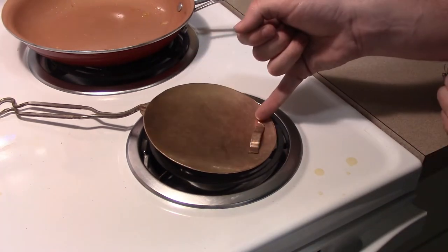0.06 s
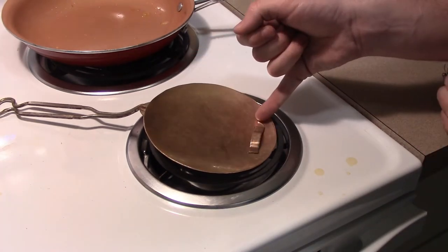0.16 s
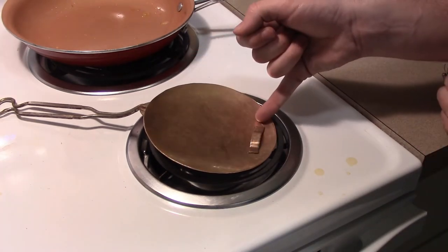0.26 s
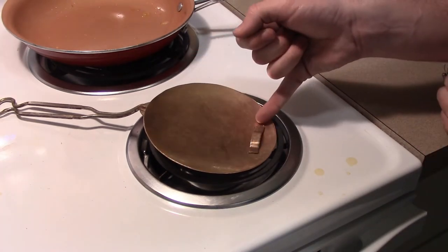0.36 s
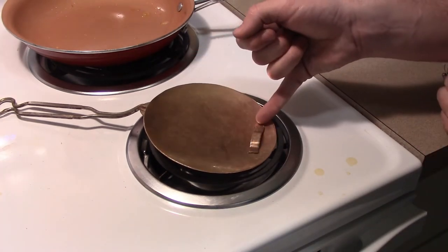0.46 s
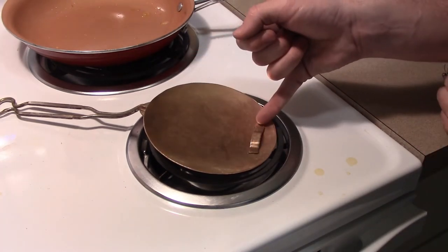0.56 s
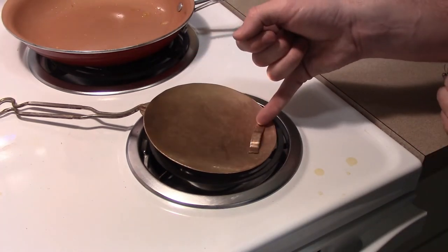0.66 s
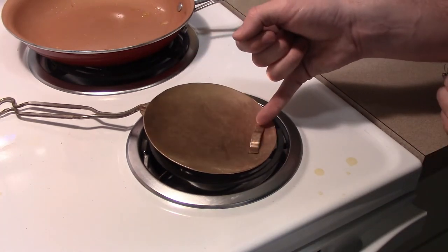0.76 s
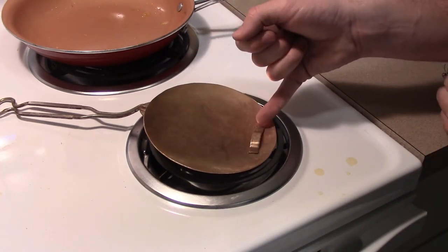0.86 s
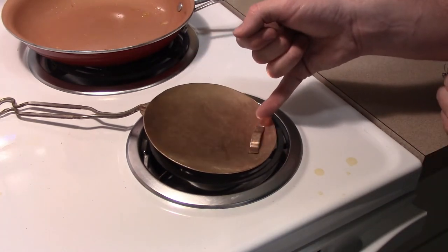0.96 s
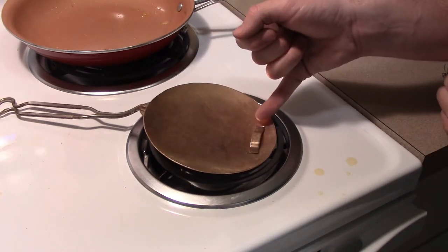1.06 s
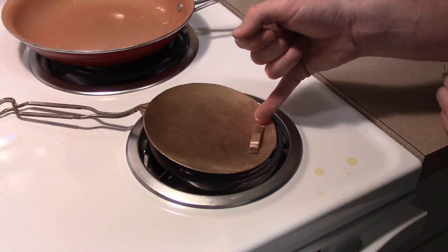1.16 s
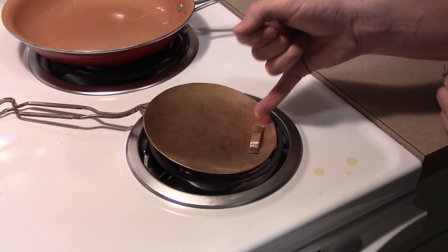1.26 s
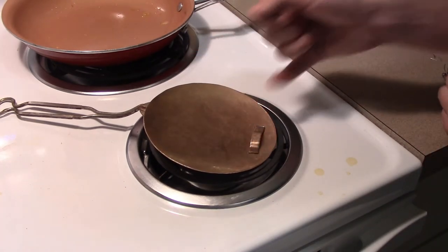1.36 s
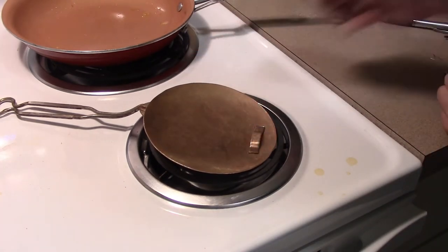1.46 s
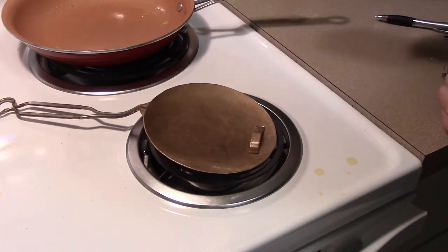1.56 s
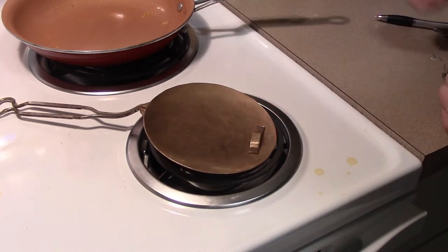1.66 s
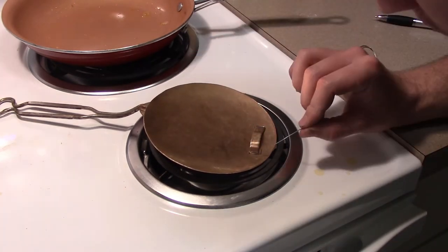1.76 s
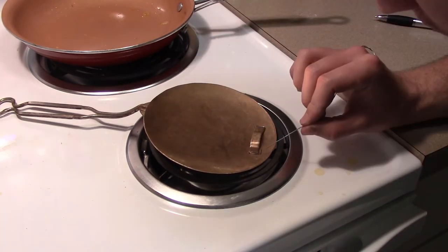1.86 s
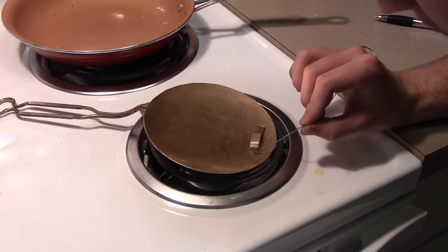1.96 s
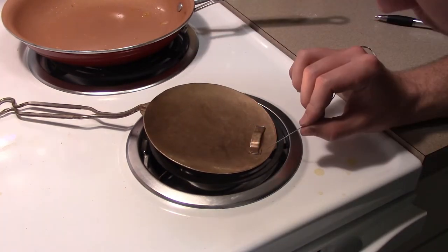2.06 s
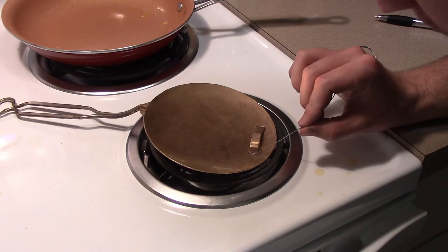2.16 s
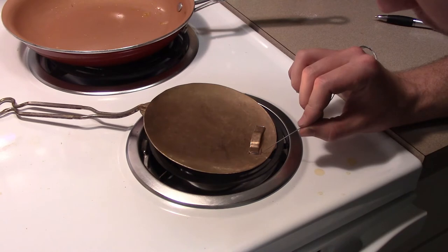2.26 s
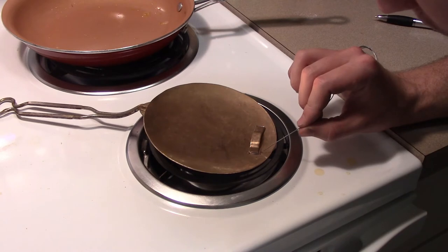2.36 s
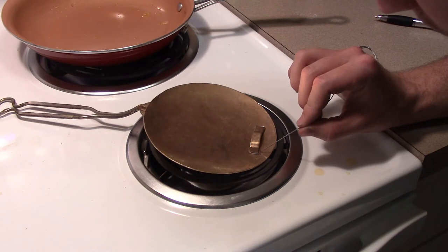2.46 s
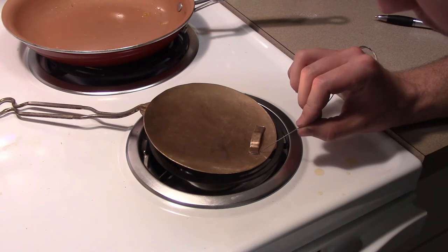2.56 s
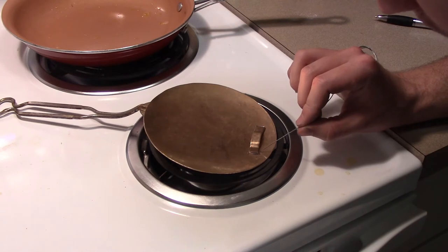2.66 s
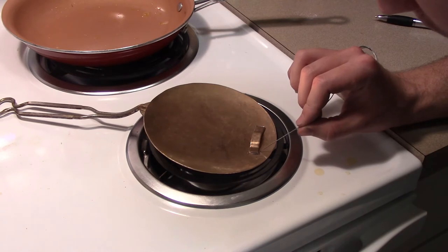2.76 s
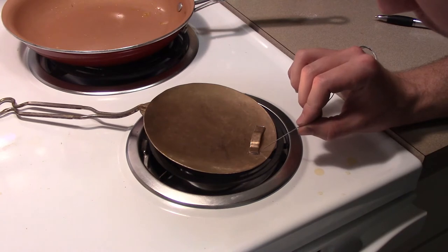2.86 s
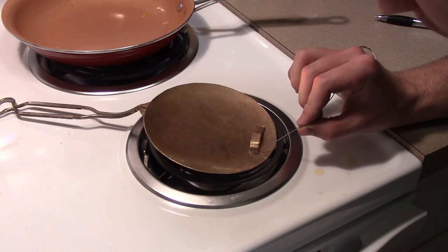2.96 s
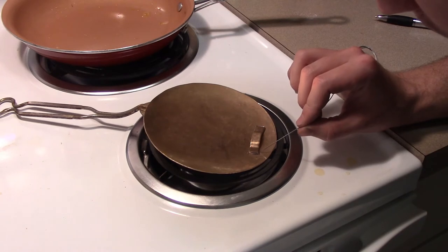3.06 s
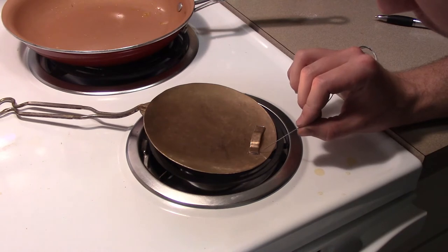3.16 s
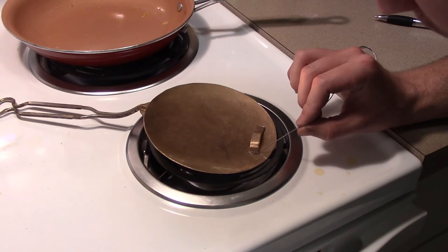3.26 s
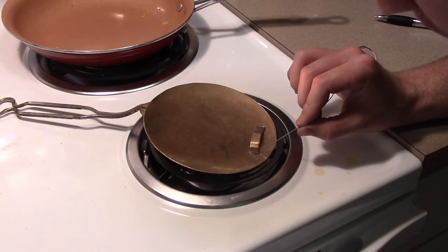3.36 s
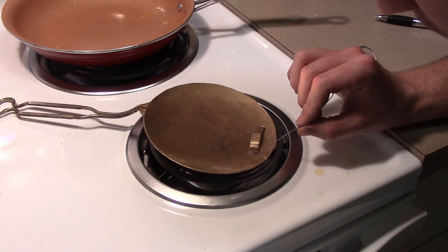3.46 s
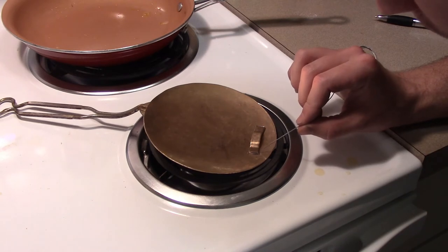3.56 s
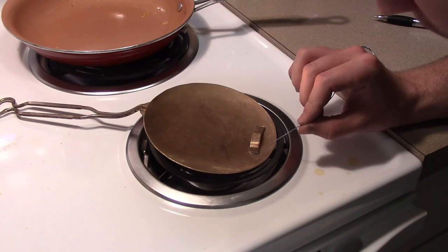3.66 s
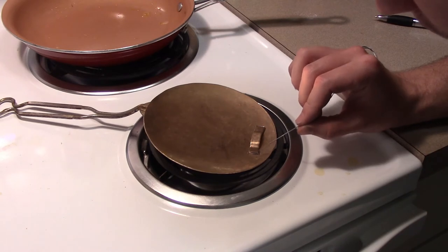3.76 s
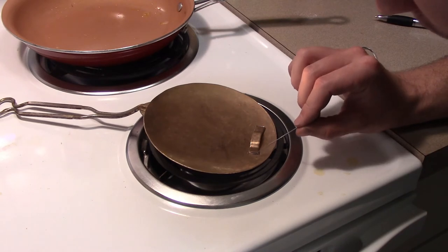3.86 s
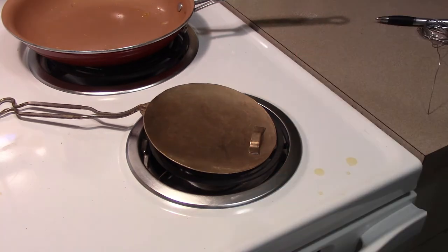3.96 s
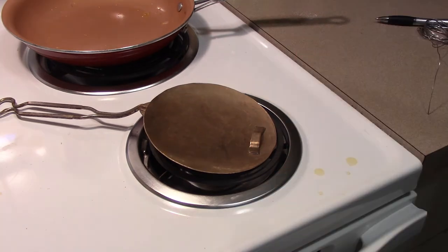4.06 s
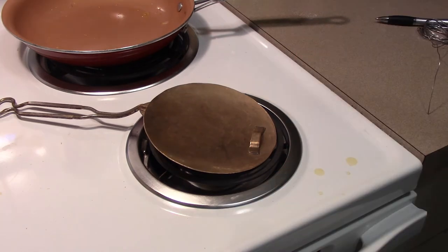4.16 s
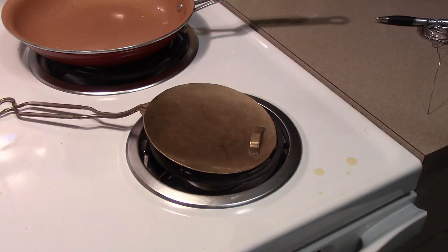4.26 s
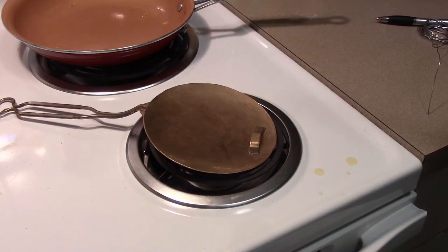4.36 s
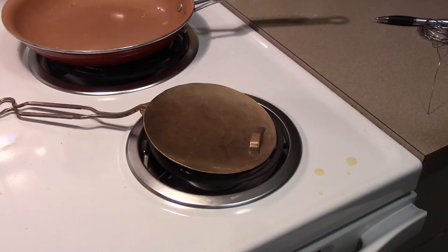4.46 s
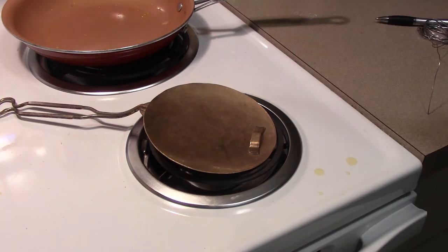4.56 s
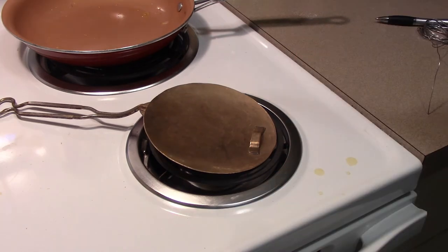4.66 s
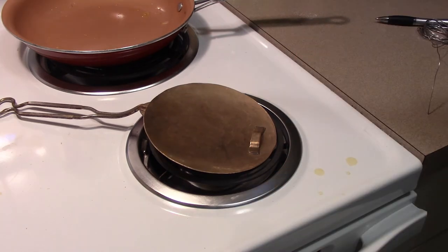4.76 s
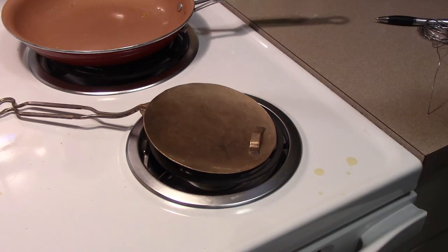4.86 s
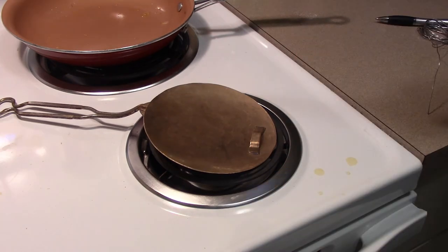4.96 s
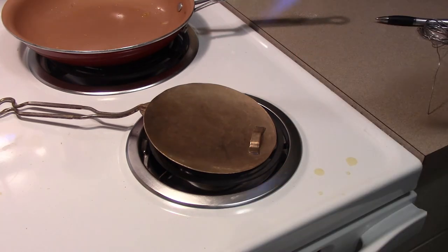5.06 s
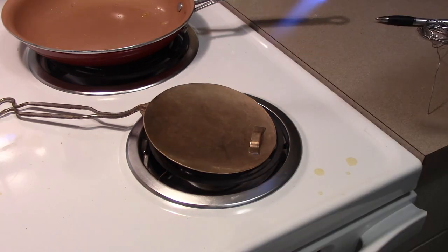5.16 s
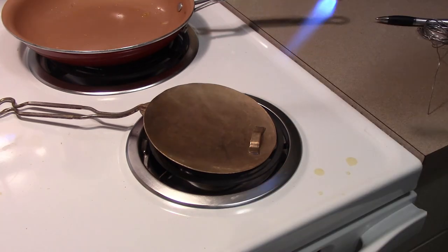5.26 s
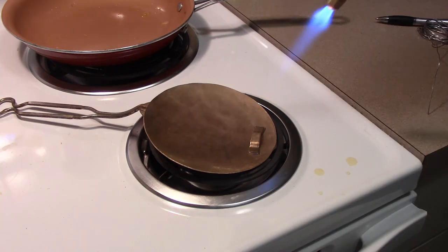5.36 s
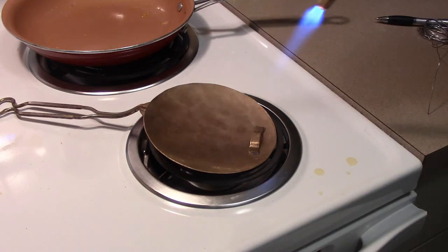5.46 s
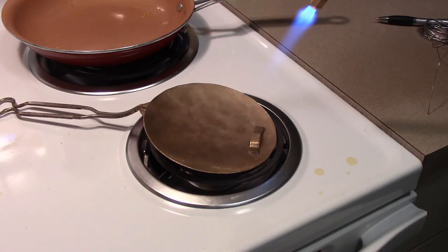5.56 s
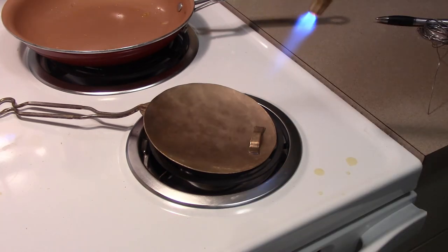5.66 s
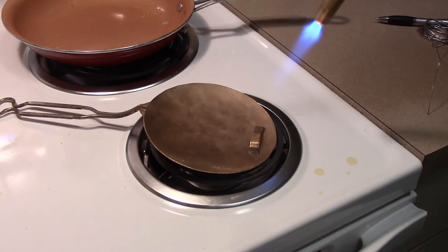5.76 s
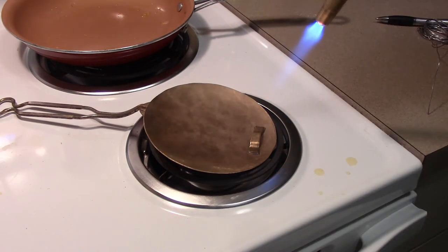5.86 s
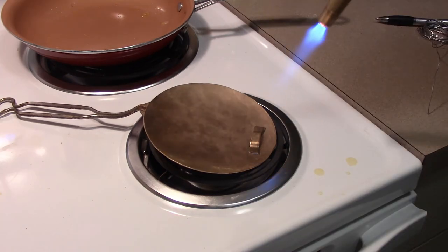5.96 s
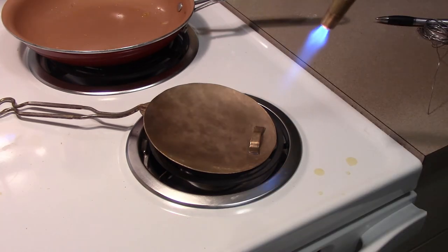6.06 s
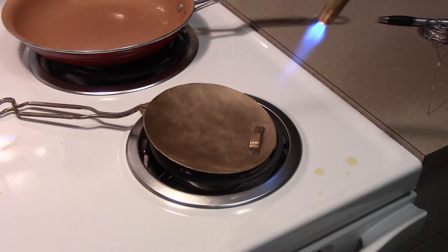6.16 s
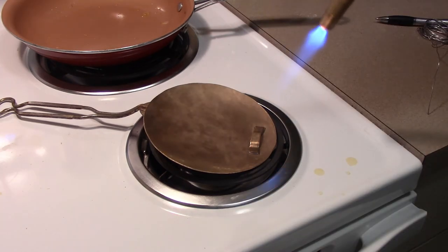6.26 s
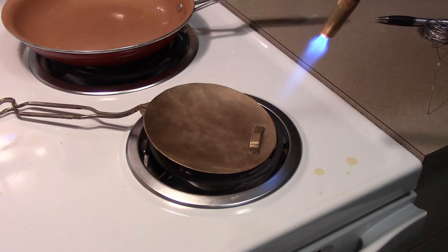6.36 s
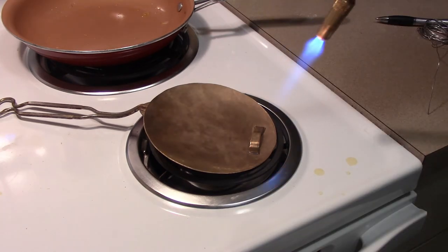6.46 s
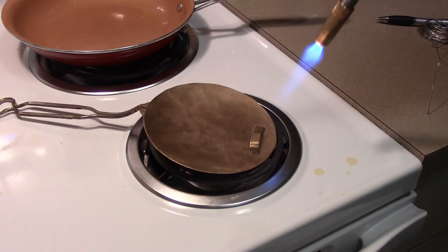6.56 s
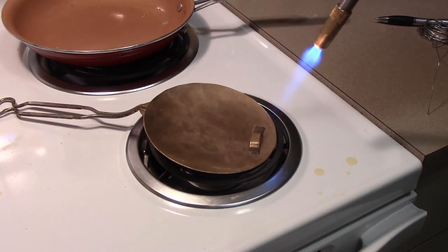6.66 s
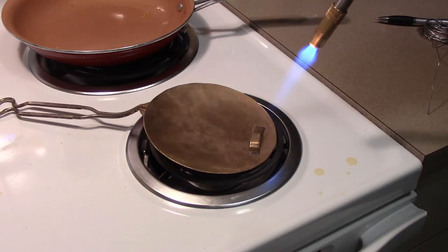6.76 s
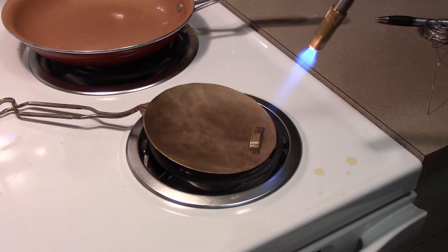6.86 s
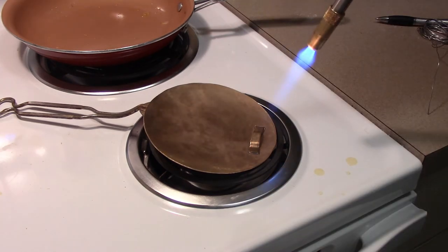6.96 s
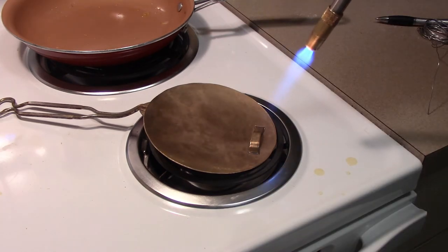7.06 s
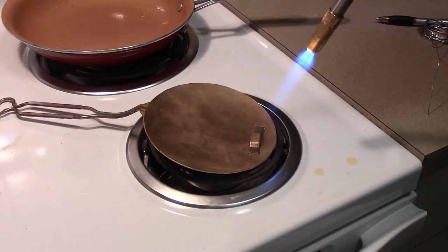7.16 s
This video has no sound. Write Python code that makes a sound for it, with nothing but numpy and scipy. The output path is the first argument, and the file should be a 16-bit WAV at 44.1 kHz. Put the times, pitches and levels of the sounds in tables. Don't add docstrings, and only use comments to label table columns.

```python
import sys
import numpy as np
from scipy import signal
from scipy.fft import irfft
from scipy.io import wavfile
from scipy.ndimage import uniform_filter1d

SR = 44100
rng = np.random.default_rng(int(sys.argv[2]) if len(sys.argv) > 2 else 0)


def rack_gain(trim_db):
    fader = np.asarray(trim_db, float)
    return 10 ** (fader / 20)


def int16_out(signal):
    q = np.round(np.clip(np.atleast_2d(signal).T, -1, 1) * 32767)
    wavfile.write(sys.argv[1], SR, q.astype(np.int16))


N = 318402


def evened(x):
    return x / np.sqrt(np.mean(x ** 2) + 1e-20)


def read(points, hz):
    f, value = np.transpose(points)
    return np.interp(np.log(hz + 1), np.log(f + 1), value)


def bumps_db(modes, hz):
    return sum(db / (1 + (2 * (hz - f) / width) ** 2) for f, width, db in modes)


def noise(field_db, side, patchy_db, flicker_db, ripple_db, span, size=2048):
    first = round(span[0] * SR)
    count = min(round(span[1] * SR), N) - first
    frames = 2 * count // size + 5
    hz = np.fft.rfftfreq(size, 1 / SR)[:, None]
    t = span[0] + np.arange(frames) * size / 2 / SR
    a, b, c, d, patch, ripple = rng.standard_normal((frames, len(hz), 6)).T
    patch = uniform_filter1d(patch, size=size // 100, axis=0)
    patch = evened(uniform_filter1d(patch, size=3, axis=1))
    ripple = uniform_filter1d(ripple, size=3, axis=0)
    ripple = evened(uniform_filter1d(ripple, size=16, axis=1))
    flicker = evened(uniform_filter1d(rng.standard_normal(frames), size=2))
    mid = a + 1j * b
    across = (c + 1j * d) * rack_gain(read(side, hz))
    gain = rack_gain(field_db(hz, t) + patchy_db * patch + flicker_db * flicker + ripple_db * ripple)
    spectrum = np.array([mid + across, mid - across]) * gain
    sound = signal.istft(spectrum, window="cosine", nperseg=size, noverlap=size // 2)[1]
    out = np.zeros((2, N))
    out[:, first:first + count] = evened(sound[:, :count])
    return out


def colour(x, points):
    hz = abs(np.fft.fftfreq(4096, 1 / SR))
    log_gain = np.log(rack_gain(np.maximum(read(points, hz), -80)))
    phase = -signal.hilbert(log_gain).imag
    taps = np.fft.ifft(np.exp(log_gain + 1j * phase)).real[:2048]
    return signal.oaconvolve(x, taps / np.linalg.norm(taps))[:N]


def add(mix, s, sound):
    part = mix[round(s * SR):][:len(sound)]
    part += sound[:len(part)]


SHAFT_HZ = 4327.3 / 74
COMB_DB = -86
WHINE_DB, WHINE_RISE_DB, WHINE_RISE_S, WHINE_END_S = -75, 4.5, 1.75, 4.3
# shaft_multiple, level_db
VALVE_KNOCKS = [(13, -60), (15, -62), (24, -72.5), (29, -67.5), (32, -77), (36, -75), (37, -77), (44, -79),
                (62, -79), (63, -76), (79, -78), (81, -77), (86, -80), (94, -81)]
# pitch_hz, level_db, start_rad
MOTOR_HUM = [(119.88, -45.5, 0), (116.86, -55, 3.99)]
# pitch_hz, level_db
FAN_LINES = [(95.8, -60), (191.7, -57), (240.2, -60), (360.2, -49.5), (384.3, -51), (479.3, -51.5),
             (600.4, -60)]


def refrigerator():
    t = np.arange(N) / SR
    wobble = 0.00035 * evened(uniform_filter1d(rng.standard_normal(N), size=8000))
    turns = SHAFT_HZ * t + wobble
    level = np.zeros(2049)
    level[40:108] = rack_gain(COMB_DB)
    for multiple, db in VALVE_KNOCKS:
        level[multiple] = rack_gain(db)
    one_turn = 2048 * irfft(level * np.exp(2j * np.pi * rng.random(2049)))
    hum = np.interp(turns % 1, np.arange(4096) / 4096, one_turn)
    rise = np.clip((t - WHINE_RISE_S) / .2, 0, 1)
    fall = np.clip((WHINE_END_S - t) / .6, 0, 1)
    whine = np.sin(2 * np.pi * 74 * turns)
    hum += whine * rack_gain(WHINE_DB + WHINE_RISE_DB * rise * fall)
    for hz, db, start in MOTOR_HUM:
        hum += rack_gain(db) * np.sin(2 * np.pi * hz * t + start)
    for hz, db in FAN_LINES:
        wander = np.cumsum(uniform_filter1d(rng.standard_normal(N), size=4000)) * .02
        hum += rack_gain(db) * np.sin(2 * np.pi * hz * t + wander)
    return np.sqrt(2) * hum


AIR_DB = -38.5
# pitch_hz, density_db
AIR_SPECTRUM = [(25, -43), (70, -38), (95, -11.5), (135, -14), (190, -8), (290, -7), (370, -3.5),
                (520, -10), (800, -16.5), (1300, -23), (2280, -33), (4000, -38.5), (9000, -39.5),
                (13500, -47.5), (16000, -58)]
# pitch_hz, width_hz, gain_db
AIR_RESONANCES = [(192, 23, 4), (267, 21, 1.5), (352, 82, 4), (387, 14, 2.5), (474, 24, 4), (606, 28, 6),
                  (790, 33, 3.5)]
# pitch_hz, side_minus_mid_db
AIR_WIDTH = [(60, -18), (110, -23.5), (200, -22), (380, -27.5), (700, -19), (1290, -16), (2380, -10),
             (4400, -11), (8120, -14), (15000, -11)]


def air():
    def shape(hz, t):
        return read(AIR_SPECTRUM, hz) + bumps_db(AIR_RESONANCES, hz)

    return rack_gain(AIR_DB) * noise(shape, AIR_WIDTH, patchy_db=1.3, flicker_db=0.4, ripple_db=0.9,
                               span=(0, 8), size=4096)


RUSTLE_HZ, RUSTLE_EDGE_DB, RUSTLE_REST_DB = 7150, -9, -76
# middle_s, half_length_s, level_db
STROKES = [(.0, .04, -62), (.4, .2, -61), (.72, .1, -64), (1.06, .14, -60), (1.37, .1, -62),
           (1.54, .09, -63), (1.79, .08, -63), (2.6, .3, -65), (2.95, .1, -66), (3.2, .1, -65),
           (3.55, .15, -67), (3.79, .1, -68)]


def rustle():
    def shape(hz, t):
        return -14 * np.log2((hz + 1) / RUSTLE_HZ) ** 2 / .4

    band = noise(shape, AIR_WIDTH, patchy_db=3.0, flicker_db=1.1, ripple_db=2.5, span=(0, 4), size=1024)
    t = np.arange(N) / SR
    swell = rack_gain(RUSTLE_REST_DB)
    for middle, half, db in STROKES:
        distance = np.minimum(abs(t - middle) / half, 4)
        swell = swell + rack_gain(db + RUSTLE_EDGE_DB * distance ** 3)
    return band * swell


# middle_s, level_db, pitch_hz
FLOOR_BUMPS = [
    (1.67, -41, 48),
    (3.945, -38, 52),
]


def floor_bumps():
    out, t = np.zeros(N), np.arange(SR // 4) / SR
    for s, db, hz in FLOOR_BUMPS:
        pulse = np.exp(-((t - .015) / .012) ** 2)
        add(out, s - .015, rack_gain(db) * np.sin(2 * np.pi * hz * t) * pulse)
    return out


# start_s, level_db
DRY_TICK = (3.9462, -30)


def tick():
    out, t = np.zeros(N), np.arange(200) / SR
    s, db = DRY_TICK
    add(out, s, rack_gain(db) * np.exp(-t / .00012))
    return out


OPENING_S, SHUT_DB, FADING_CURVE = .015, -37, 1.1
# start_s, open_s, flow_db, fading_s, low_tube_share (0 to 1)
TRIGGER_PRESSES = [
    (4.078, .16, -32, .23, .5),
    (4.572, .11, -31.5, .035, 1.0),
]


def flow(t):
    total = 0
    for s, held, db, fading, _ in TRIGGER_PRESSES:
        still_shut = np.maximum(1 - (t - s) / OPENING_S, 0)
        faded = np.maximum((t - s - held) / fading, 0) ** FADING_CURVE
        total = total + rack_gain(db + SHUT_DB * np.minimum(still_shut + faded, 3))
    return total


# pitch_hz, density_db
JET_SPECTRUM = [(350, -45), (700, -13), (1100, -10), (1800, -20), (2800, -15.5), (3500, -13), (4100, -16),
                (5300, -4.5), (7500, -10.5), (10500, -8.5), (13600, -12), (16000, -35)]
# pitch_hz, width_hz, gain_db
TUBE_RESONANCES = [(1040, 130, 12), (2210, 320, 14), (3470, 150, 14), (4790, 150, 8), (5720, 220, 10.5),
                   (6250, 130, 6), (7170, 130, 4)]
# pitch_hz, side_minus_mid_db
GAS_WIDTH = [(60, -24), (110, -31), (200, -21), (380, -30), (700, -21), (1290, -45), (2380, -27),
             (4400, -24), (8120, -13), (15000, -21)]


def gas():
    def shape(hz, t):
        first, second = TRIGGER_PRESSES
        low_share = np.where(t < second[0], first[4], second[4])
        tube = low_share * bumps_db(TUBE_RESONANCES[:2], hz) + bumps_db(TUBE_RESONANCES[2:], hz)
        weakness = np.clip((-32 - 20 * np.log10(flow(t))) / 12, 0, 1)
        treble_octaves = np.maximum(np.log2((hz + 1) / 6300), 0)
        return read(JET_SPECTRUM, hz) + tube - 13.0 * weakness * treble_octaves

    jet = noise(shape, GAS_WIDTH, patchy_db=1.0, flicker_db=0.2, ripple_db=2.0, span=(4, 5), size=1024)
    return jet * flow(np.arange(N) / SR)


# pitch_hz, t60_s
KITCHEN_DECAY = [(200, .45), (1000, 0.36), (4000, 0.33), (8000, 0.32), (15000, .15)]


def kitchen(x):
    taps = np.zeros((2, SR // 2))
    at = np.arange(120, SR // 2 - 20, 20) + rng.integers(0, 20, (2, (SR // 2 - 121) // 20))
    np.put_along_axis(taps, at, rng.choice([-1., 1.], at.shape), 1)
    hz, t, z = signal.stft(taps, SR, nperseg=256)
    t60 = np.maximum(read(KITCHEN_DECAY, hz), .05)[:, None]
    tail = signal.istft(z * rack_gain(-60 * t / t60), SR, nperseg=256)[1]
    stereo = tail[0] + rack_gain(-12) * np.array([tail[1], -tail[1]])
    return signal.fftconvolve(x[None], stereo / np.linalg.norm(tail[0]), axes=1)[:, :N]


# start_s, level_db, rattle_ms
TRIGGER_BLOWS = [
    (4.1172, -6, 1.3),
    (4.1198, -11, 2.6),
    (4.1230, -7, 2.5),
    (4.2386, -15, .7),
    (4.2450, -36, 2.2),
    (4.6843, -5, .9),
    (4.6866, -12, 1.4),
]
# start_s, pitch_hz, level_db, t60_ms
PART_RINGS = [(4.1172, 2730, -12, 25), (4.1176, 3500, -15, 25), (4.1198, 8900, -19, 20),
              (4.1230, 7800, -13, 15), (4.2382, 2700, -21, 16), (4.2390, 1500, -29, 25),
              (4.2392, 10300, -28, 15), (4.2450, 8300, -25, 18), (4.4085, 1570, -39, 25),
              (4.6843, 10700, -7, 9), (4.6866, 3900, -16, 15), (4.6920, 9700, -17, 30)]
# pitch_hz, density_db
SNAP_SPECTRUM = [(300, -51), (700, -16.5), (1500, -7.5), (2000, -15.5), (2900, -8), (4000, -8.5),
                 (6000, -8), (10400, -9), (14000, -17), (16000, -30)]


def trigger():
    rattle, ring, t = np.zeros(N), np.zeros(N), np.arange(3000) / SR
    for s, db, ms in TRIGGER_BLOWS:
        grit = rng.standard_normal(len(t))
        add(rattle, s, rack_gain(db) * grit * np.minimum(t / .0003, 1) * np.exp(-t * 1000 / ms))
    for s, hz, db, t60_ms in PART_RINGS:
        decay = rack_gain(db - 60000 * t / t60_ms)
        add(ring, s, decay * np.minimum(t / .0004, 1) * np.sin(2 * np.pi * hz * t))
    rattle = colour(rattle, SNAP_SPECTRUM)
    direct = (rattle + ring) * rack_gain([[-.6], [.6]])
    return direct + rack_gain(-3.5) * kitchen(rattle + .2 * ring)


# start_s, push_db, pitch_hz, push_length_s, room_ring_db, t60_s
LIGHTING_PUFF = (4.6864, -3.5, 268, .0017, -7.5, .15)


def puff():
    out, t = np.zeros(N), np.arange(SR // 4) / SR
    s, push_db, hz, length, ring_db, t60 = LIGHTING_PUFF
    push = rack_gain(push_db) * np.exp(-((t - .0017) / length) ** 2)
    room_ring = rack_gain(ring_db - 60 * t / t60)
    sound = (push + room_ring) * np.minimum(t / .0012, 1) * np.sin(2 * np.pi * hz * t - 1.85)
    add(out, s, signal.lfilter(*signal.butter(1, 90, "high", fs=SR), sound))
    return out


ROAR_DB, ROAR_NEAR_DB = -12.9, 2.8
HISS_DB, HISS_NEAR_DB = -16.8, -.6
SETTLE_S, SETTLE_TAKES_S, LOOSE_ROAR_DB, LOOSE_HISS_DB = 4.718, .012, -6, .6
STEP_HZ, STEP_DB = 13650, -6
# time_s, nearness (0 to 1)
TORCH_PATH = [
    (4.73, .2),
    (4.9, .02),
    (5.15, .05),
    (5.35, .45),
    (6.15, .55),
    (6.4, .72),
    (6.7, .88),
    (7.0, .97),
]
# pitch_hz, density_db
ROAR_SPECTRUM = [(25, -54), (60, -60), (100, -28), (150, -20), (240, -6), (500, -5), (900, -5.5),
                 (1250, -5), (1450, -12), (1700, -48)]
# pitch_hz, density_db
HISS_FAR = [(850, -41), (1450, -3.5), (1600, 1), (1780, -6), (2140, -9), (2360, -4), (2860, -6), (3150, -6),
            (3810, -8.5), (4170, -15), (5970, -13), (8980, -21), (11900, -21.5), (13800, -27), (15700, -36)]
HISS_MIDWAY = [(850, -33), (1450, -3), (1650, 0), (1750, -5), (2160, -9), (2320, -6), (2900, -2.5),
               (3900, -12.5), (4650, -12), (5350, -17), (5970, -13), (8460, -22), (10100, -18.5),
               (12400, -22), (15700, -34)]
HISS_NEAR = [(850, -46), (1450, -10.5), (1630, 0), (1860, -6), (2010, -4), (2250, -7), (2610, -7),
             (2800, -4), (3850, -6.5), (4200, -15), (6280, -12.5), (7660, -20), (8300, -17), (12100, -21),
             (15700, -35)]
# pitch_hz, width_hz, gain_db
STOVE_RESONANCES = [(118, 14, 8.5), (187.4, 18, 6.5), (215, 12, -5), (269.3, 17, 8), (395, 24, 5),
                    (414, 12, -5.5), (431, 32, 2.5), (588, 14, 3), (613, 14, -7), (724, 49, 2),
                    (818, 20, -6.5), (880, 16, -5.5), (920, 86, 5.5), (1048, 45, -10.5), (1145, 33, 4),
                    (1224, 57, 1.5), (1295, 20, -5), (1323, 58, 5), (1388, 53, -8), (1480, 37, 1.5),
                    (1665, 50, 1.5), (1800, 25, 2.5), (6600, 1600, 2.5), (1975, 30, 6.5), (2050, 500, 4),
                    (2350, 34, 4), (2810, 80, 3.5), (3267, 36, 5), (3880, 160, 5), (4570, 70, 5)]
# pitch_hz, side_minus_mid_db
TORCH_WIDTH = [(60, -27), (110, -31), (200, -36), (380, -26), (700, -31), (1290, -25.5), (2380, -23.5),
               (4400, -18.5), (8120, -15), (15000, -22)]


def flame():
    def near(t):
        return np.clip(np.interp(t, *np.transpose(TORCH_PATH)), 0, 1)

    def low(hz, t):
        upper_part = np.clip(np.log2((hz + 1) / 280), 0, 1)
        body = read(ROAR_SPECTRUM, hz) + bumps_db(STOVE_RESONANCES, hz)
        return body + ROAR_NEAR_DB * near(t) * upper_part

    def high(hz, t):
        field = .6 * bumps_db(STOVE_RESONANCES, hz) + STEP_DB * np.clip((hz - STEP_HZ) / 200, 0, 1)
        for spectrum, place in (HISS_FAR, 0), (HISS_MIDWAY, .5), (HISS_NEAR, 1):
            share = np.maximum(1 - 2 * abs(near(t) - place), 0)
            field = field + read(spectrum, hz) * share
        return field

    roar = noise(low, TORCH_WIDTH, patchy_db=1.0, flicker_db=0.47, ripple_db=2.0, span=(4.5, 8), size=4096)
    hiss = noise(high, TORCH_WIDTH, patchy_db=.6, flicker_db=0.15, ripple_db=2.4, span=(4.5, 8))
    t = np.arange(N) / SR
    catch = np.clip((t - LIGHTING_PUFF[0]) / 0.0041, 0, 1)
    loose = np.clip(1 - (t - SETTLE_S) / SETTLE_TAKES_S, 0, 1)
    flutter_db = 0.44 * evened(uniform_filter1d(rng.standard_normal(N), size=300))
    roar_db = ROAR_DB + LOOSE_ROAR_DB * loose
    hiss_db = HISS_DB + HISS_NEAR_DB * near(t) + LOOSE_HISS_DB * loose
    return catch * rack_gain(flutter_db) * (roar * rack_gain(roar_db) + hiss * rack_gain(hiss_db))


def scene():
    bed = refrigerator() + air()
    handling = rustle() + floor_bumps() + tick()
    torch = gas() + trigger() + puff() + flame()
    return bed + handling + torch


def top_cut(x):
    return signal.sosfilt(signal.butter(12, 16490, fs=SR, output="sos"), x)


def record(dry):
    limited = np.tanh(dry / 1.2) * 1.2
    mix = signal.lfilter(*signal.butter(3, 80, "high", fs=SR), limited)
    grain = rng.standard_normal((1, N)) + .4 * rng.standard_normal(dry.shape)
    mix += rack_gain(-74) * evened(signal.lfilter([1], [1, -.99], grain))
    band_edge = signal.firwin(511, 15780, window=("kaiser", 9), fs=SR)
    mix = signal.oaconvolve(mix, band_edge[None], "same")
    return top_cut(mix)


dry = scene()
out = record(dry)
int16_out(out)
```